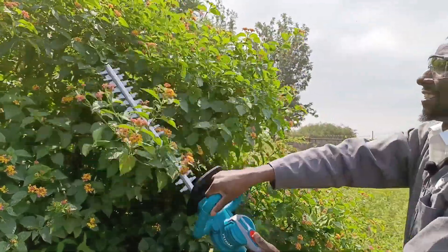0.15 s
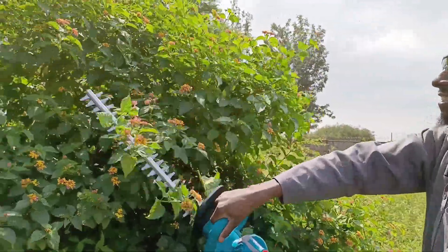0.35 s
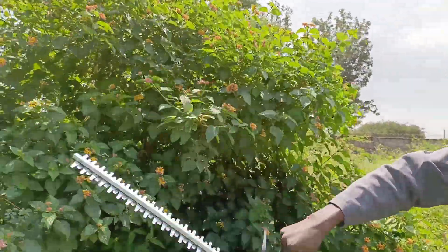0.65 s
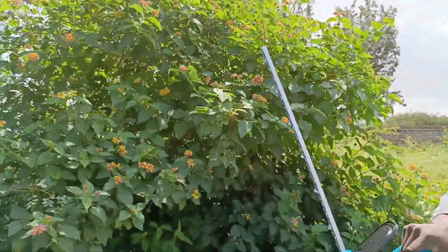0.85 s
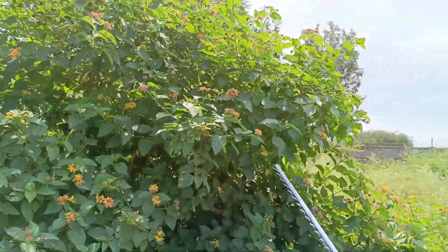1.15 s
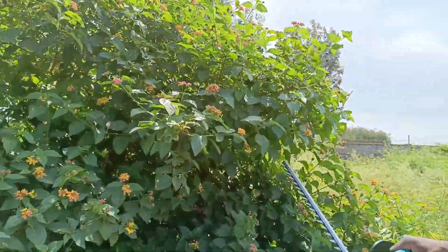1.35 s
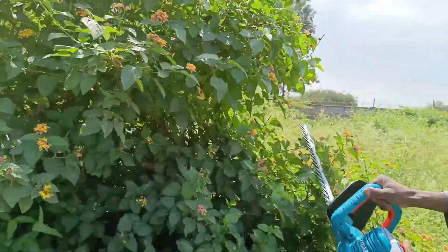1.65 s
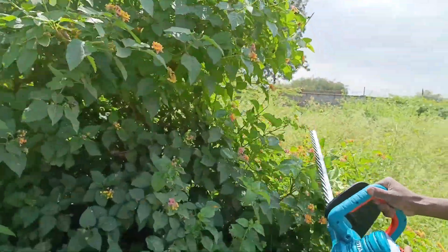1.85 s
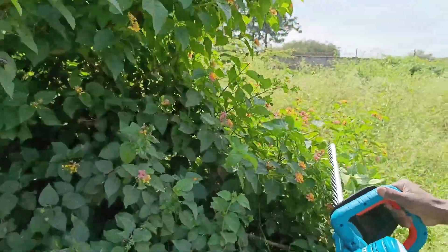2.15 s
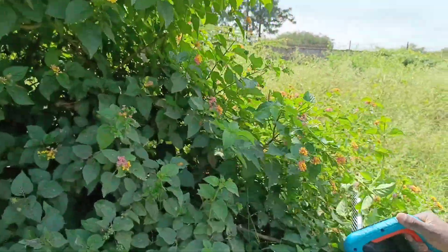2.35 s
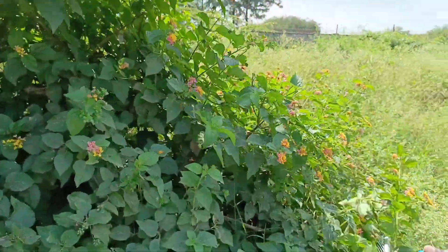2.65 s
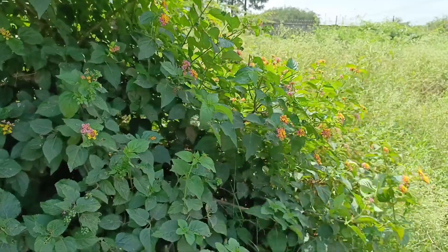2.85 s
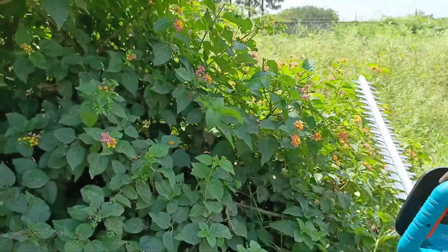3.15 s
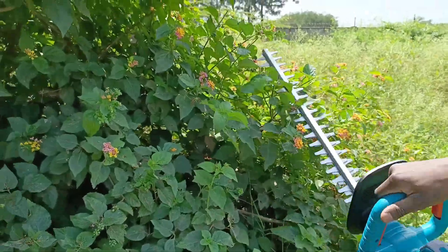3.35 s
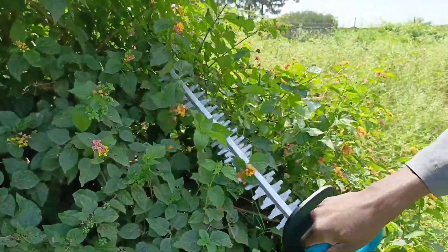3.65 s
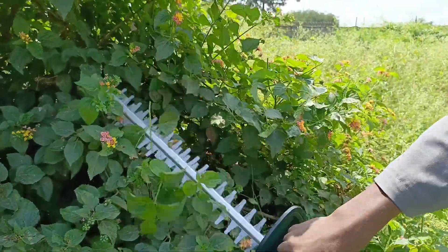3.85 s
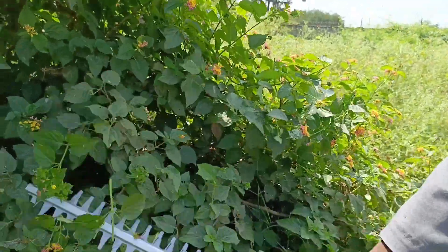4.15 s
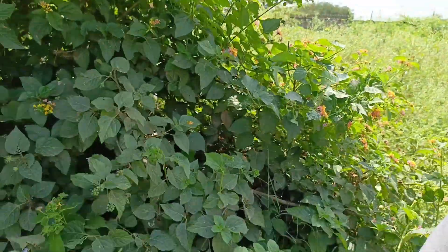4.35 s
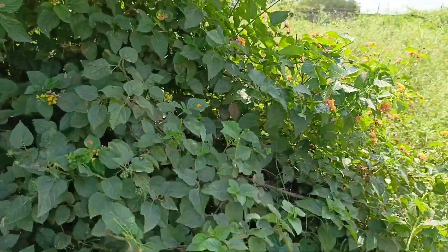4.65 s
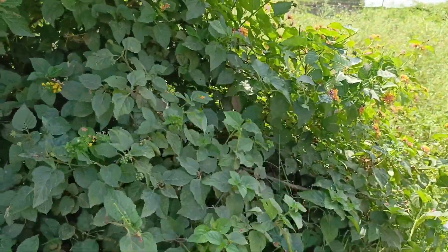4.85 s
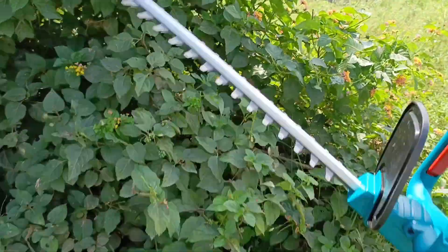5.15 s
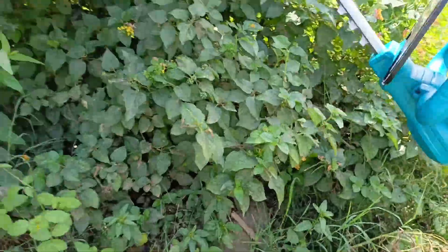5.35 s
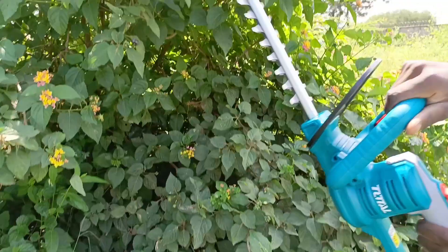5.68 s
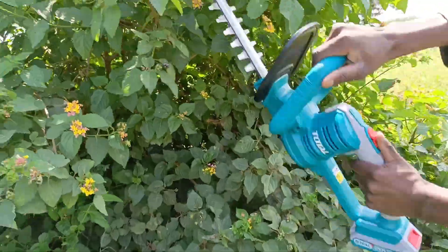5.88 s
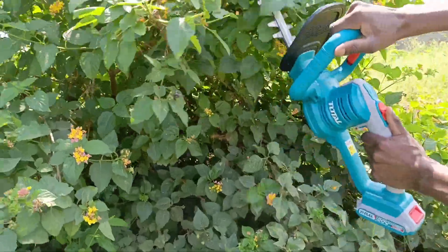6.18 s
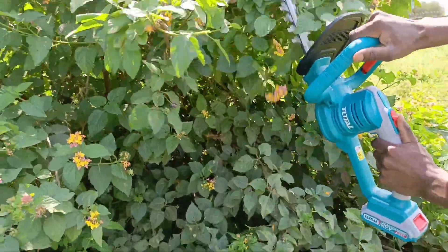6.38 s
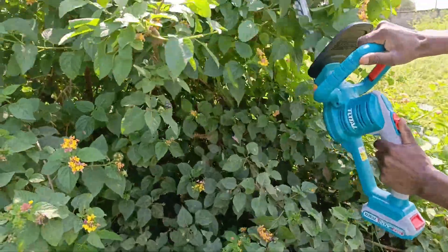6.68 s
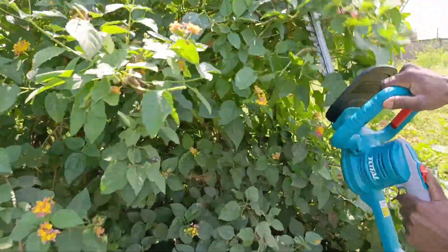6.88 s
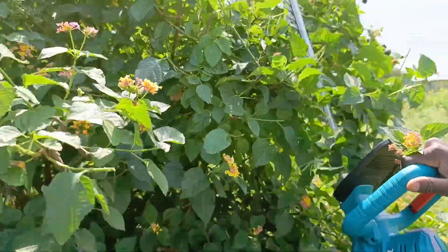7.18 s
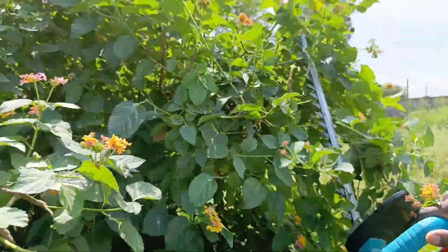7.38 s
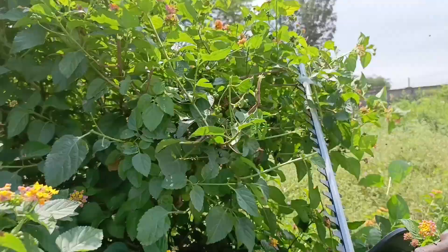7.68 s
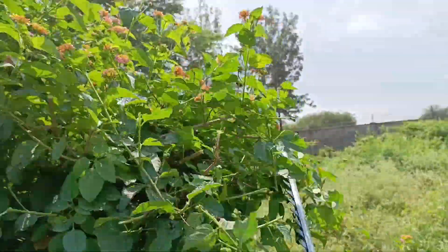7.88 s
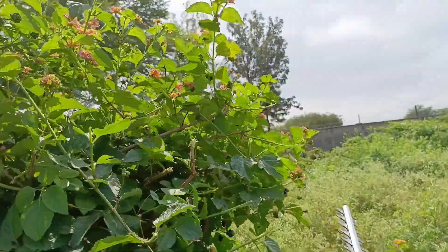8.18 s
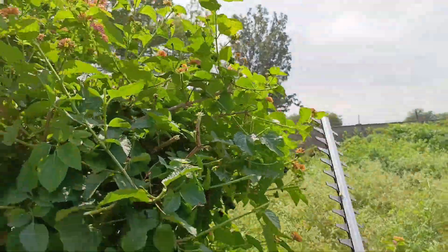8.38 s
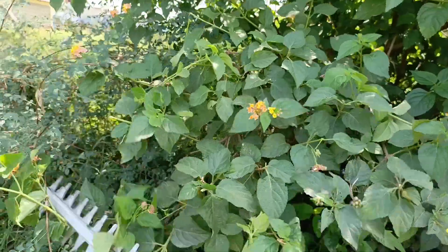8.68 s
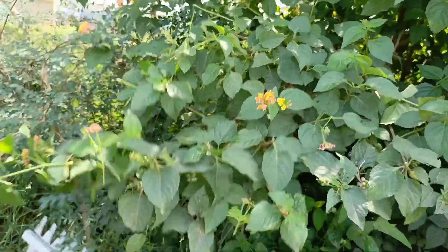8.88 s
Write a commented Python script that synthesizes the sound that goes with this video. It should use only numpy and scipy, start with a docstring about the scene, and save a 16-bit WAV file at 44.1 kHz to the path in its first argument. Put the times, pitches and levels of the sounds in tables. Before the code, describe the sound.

A handheld trimmer's reciprocating blades make a dry, rapid, noisy rattle, about forty-three strokes a second, with raspy metallic ring and harder bites into twigs. Five runs begin and end abruptly with plastic trigger and gear clicks; leaves settle softly in the short pauses. Close microphone, outdoors with no echoing walls, only a low air rumble and a weak far engine behind.

```python
"""A cordless hedge trimmer works through a leafy bush in five runs, close by and in the open air.
Its blades shuttle about 43 times a second; every stroke is a burst of noisy tooth impacts that shakes
the housing and rings the steel. Noise bursts and dying sines make the trigger and gear clicks at starts
and stops, and low noise thuds the handling bumps. Leaves settle in the pauses as showers of tiny blows;
a far engine drones on three harmonics over a soft rumble of filtered noise."""
import sys
import numpy as np
from scipy import signal
from scipy.fft import rfft, irfft, next_fast_len
from scipy.io import wavfile
from scipy.ndimage import map_coordinates

SR = 44100
rng = np.random.default_rng(int(sys.argv[2]) if len(sys.argv) > 2 else 0)


def unload_audio(sound):
    """Save the sound as a 16-bit wav file, at the path given as the first command line argument."""
    columns = np.transpose(np.atleast_2d(sound))
    # keep every value between -1 and 1, then stretch to whole-number steps
    steps = np.round(np.clip(columns, -1, 1) * 32767)
    wavfile.write(sys.argv[1], SR, steps.astype(np.int16))


N = 397782  # length in samples

STROKE_HZ = 43.24  # blade strokes a second
TOP_HZ = 15800  # nothing sounds above this
LEAVES_DB = -66.5  # leaves stirring
BAR_DB = -47.5  # ring of the guide bar while running, before it sings out

# Colour of the open-air rumble. Each row: frequency in Hz, relative level in dB.
AIR_COLOUR = [(15, -40.5), (25, -26), (52, -15.5), (76, -13), (94, -9), (110, -10), (157, -14.5),
              (333, -24), (587, -24), (1220, -28.5), (12100, -62), (15800, -73)]
# Far engine. Each row: time in seconds, pitch in Hz, level in dB.
FAR_ENGINE = [(0, 80, -52), (1.6, 85.9, -57.5), (2.3, 102, -51), (2.8, 140.6, -54), (3.25, 163, -52),
              (3.7, 139.7, -71), (4.35, 55.7, -55), (5.2, 57.9, -60.5), (8.4, 71.7, -55), (9, 74, -68)]
# Branches spring back in the pauses. Each row: middle in seconds, half-length in seconds,
# lift over the stirring in dB.
RUSTLES = [(.72, 0.14, 10.5), (4.92, .09, 8.5), (5.25, .06, 6), (8.38, 0.16, 8.5)]
# Dull handling thumps. Each row: start in seconds, level in dB.
BUMPS = [(6.12, -35), (7.51, -33)]
# Trigger and gear clicks. Each row: start in seconds, level in dB, relative trim of the knock in dB,
# relative trim of the snap in dB, time for the burst to fall by 60 dB in seconds.
CLICKS = [(0.659, -27, -12, -7, .02), (0.677, -27, -12, -15, .022), (0.985, -30, -8, -10, .016),
          (1.013, -27, -17, -15, 0.021), (1.372, -28, -7, -20, .03), (4.788, -20, -18, -9, .022),
          (4.808, -12.5, -16, -14, .022), (5.127, -24.5, -19, -12, .018), (5.292, -11.5, -17, -18, .03),
          (8.254, -2, -21.5, -15.5, 0.035), (8.463, -10, -20, -15, .014)]
# Modes struck by a click. Each row: frequency in Hz, relative level in dB, time to fall by 60 dB in seconds.
CLICK_MODES = [(590, -25.5, 0.19), (2207, -37, .16), (2627, -36, 0.15), (3000, -11, 0.016),
               (5880, -12.5, 0.012), (10290, -42, 0.17)]
# Trigger held. Each row: start in seconds, release in seconds, spin-up in seconds,
# time to brake by 60 dB in seconds.
RUNS = [(-.03, 0.579, .01, 0.12), (1.016, 1.318, 0.051, 0.07), (1.376, 4.702, 0.061, 0.1),
        (5.29, 8.187, 0.075, 0.12), (8.47, 9.061, 0.005, .09)]
# Hard strokes, where the teeth meet a stem. Each row: time in seconds, level over a plain stroke in dB.
BITES = [(1.133, 1), (1.642, 6.5), (1.67, 5.5), (1.735, 3.5), (2.011, 5.5), (2.064, 5), (2.25, 3),
         (2.34, 6.5), (2.509, 4.5), (2.585, 5), (2.962, 6.5), (3.061, 6), (3.635, 3.5), (4.084, 1.5),
         (4.316, 3), (5.914, 5.5), (6.055, 6), (6.172, 5.5), (6.591, 6.5), (7.126, 3.5), (7.542, 5),
         (8.121, 2.5), (8.54, 3.5), (8.61, 5.5)]
# How the tool is held. Each row: time in seconds, view, where 0 is blades edge-on, 1 the flat of the
# blades and 2 the motor side towards the listener.
VIEW = [(.55, 1.66), (1.1, 0.24), (2.15, 0.21), (2.6, 0.58), (3.1, 0.39), (3.9, 1.2), (4.7, 1.34),
        (5.55, 0.53), (5.88, 2.12), (7.1, 1.77), (7.85, 1.93), (8.5, 1.2)]
# Effort of the cut. Each row: time in seconds, clatter level in dB.
EFFORT = [(0, -19), (.55, -22.5), (1.1, -19.5), (1.5, -20.5), (2.5, -20.5), (2.85, -22.5), (3.05, -20.5),
          (4.1, -22), (5.6, -21), (6.2, -21), (8, -21), (8.9, -21)]
# Broad colour of the clatter. Each row: frequency in Hz, relative level in dB.
CLATTER_COLOUR = [(100, -37), (200, -23.5), (360, -16.5), (480, -2.5), (590, -6.5), (950, -0.5),
                  (1950, -6.5), (3400, -7.5), (4400, -10), (5700, -10.5), (6200, -15.5), (7200, -18),
                  (8100, -26), (9900, -23.5), (11400, -31), (13000, -34.5), (15700, -29.5)]
# Resonances of housing and blades. Each row: frequency in Hz, width in Hz, lift in dB.
BODY_MODES = [(297, 38, 6.5), (491, 86, 4.5), (714, 195, 4), (991, 144, 4), (1747, 166, 5.5),
              (2355, 390, 5.5), (2710, 360, 4.5), (3406, 600, 3), (5970, 150, 5), (6545, 73, 9),
              (7670, 160, 5.5), (8620, 310, 8), (9240, 130, 9.5), (10080, 95, 3.5), (11680, 120, 4),
              (14780, 200, 5)]
# Housing, gearbox, guard, cutter and teeth each radiate in a band. Each row: centre in Hz, half-width in
# octaves, lift edge-on in dB, lift flat in dB, lift motor side in dB, dB gained per dB of rasp.
PARTS = [(1076, 0.3, 0.5, -3.5, 2, 0), (2000, 0.28, 3.5, 2.5, -8, 0), (3640, 0.21, -3.5, 5, 0, 0),
         (5270, 0.27, -0.5, 0, -4, 0.56), (8600, 0.4, -4.5, 3.5, 1.5, 0)]
# The blades rub hard on each other and the cutter rings. Each row: middle in seconds,
# half-length in seconds, rasp in dB.
RASPS = [(.3, 0.11, 9.5), (1.8, .3, 4.5), (2.52, 0.35, 10), (3.52, .17, 5), (4.3, 0.48, 5.5), (8.87, .1, 4)]
# A band of the clatter thins out for a moment. Each row: middle in seconds, half-length in seconds,
# change in dB, centre in Hz, half-width in octaves.
HOLLOWS = [(2.2, 0.6, -7, 1940, .08), (3.13, 0.23, -11, 1054, 0.25), (8.7, .4, -4.5, 4500, 0.26)]
# Modes of the guide bar. Each row: frequency in Hz, relative level in dB, time to fall by 60 dB in seconds.
BAR_MODES = [(6460, -26, 0.039), (7035, -3, 0.31), (8970, -15, 0.12), (10700, -29, .13)]
# The guide bar sings out. Each row: middle in seconds, half-length in seconds, lift in dB.
SINGS = [(2.2, 0.6, 5), (3.12, 0.17, 8), (4.1, 0.29, 9), (6.3, 0.81, 11)]
# The guide bar rings as the blades halt. Each row: start in seconds, level in dB.
BRAKES = [(.58, -50), (1.325, -47), (4.73, -33.5), (8.255, -47)]


def amp(db):
    """Decibels to gain."""
    return 10 ** (np.asarray(db) / 20)


def unit(x):
    """x at rms 1."""
    return x / np.sqrt(np.mean(x ** 2) + 1e-20)


def along(points, hz):
    """A curve through (Hz, value) points on a log axis."""
    f, v = np.transpose(points)
    return np.interp(np.log(hz + 1), np.log(f + 1), v)


def curves(rows):
    """One value per sample for each column after the time."""
    s, *columns = np.vstack(rows).T
    return [np.interp(np.arange(N) / SR, s, column) for column in columns]


def swells(rows):
    """A smooth rise and fall for every (middle s, half-length s, dB) row, in dB."""
    t = np.arange(N) / SR
    return sum(db * np.exp(-((t - s) / half) ** 2) for s, half, db in rows)


def wobble(rate):
    """A smooth random curve, rate knots a second."""
    knots = rng.standard_normal(int(N * rate / SR) + 4)
    return map_coordinates(knots, [np.arange(N) * rate / SR])


def filtered(x, response):
    """x times a response of frequency."""
    m = next_fast_len(N + SR // 2)
    return irfft(rfft(x, m) * response(np.fft.rfftfreq(m, 1 / SR)), m)[:N]


def band(x, lo_hz, hi_hz):
    """The part of x between two soft edges."""
    return filtered(x, lambda f: (1 - 1 / (1 + (f / lo_hz) ** 8)) / (1 + (f / hi_hz) ** 8))


def lifted(x, hz, octaves, db):
    """x with one band raised or lowered by a changing amount."""
    part = filtered(x, lambda f: np.exp(-(np.log2((f + 1) / hz) / octaves) ** 2))
    return x + part * (amp(db) - 1)


def struck(x, gain_db, size=8192):
    """x through a body of the given colour, which rings only after each blow."""
    # folding the cepstrum forward makes the response minimum-phase
    cepstrum = irfft(np.log(amp(gain_db(np.fft.rfftfreq(size, 1 / SR))) + 1e-6))
    cepstrum[1:size // 2] *= 2
    cepstrum[size // 2 + 1:] = 0
    body = irfft(np.exp(rfft(cepstrum)))
    return signal.fftconvolve(x, body)[:N]


def impacts(rate, spread_db):
    """Random tiny blows of unequal size, rate a second on average, rms 1."""
    hits = rng.random(N) < rate / SR
    sizes = amp(spread_db * np.clip(rng.standard_normal(N), -2, 2))
    return unit(hits * rng.choice([-1, 1], N) * sizes)


def mode(hz, t60):
    """A dying sine whose envelope starts at 1 and falls 60 dB in t60 seconds."""
    t = np.arange(SR // 2) / SR
    return amp(-60 * t / t60) * np.sin(2 * np.pi * hz * t)


def played(rows, shape):
    """One shape sounded at every (s, dB) row."""
    blows = np.zeros(N)
    for s, db in rows:
        blows[round(s * SR)] = amp(db)
    return signal.fftconvolve(blows, shape)[:N]


def reflected(x, delay, swing, share):
    """x plus its bounce off a near surface; the path changes slowly as the tool is swept about."""
    lag = delay * np.exp(swing * wobble(1.5)) * SR
    return x + share * map_coordinates(x, [np.arange(N) - lag])


def facing(levels_db):
    """Level of a part as the tool turns, from its levels in the three views."""
    return np.interp(curves(VIEW)[0], np.arange(len(levels_db)), levels_db)


def outdoors(air_db=-53, overtone_db=-8):
    """Soft open-air rumble and a far engine that changes speed and flutters on the wind."""
    hz, db = curves(FAR_ENGINE)
    drift, flutter_db = .05 * wobble(40), 2 * wobble(45)
    phase = 2 * np.pi * np.cumsum(hz * (1 + drift)) / SR
    # each overtone is weaker than the one below by overtone_db
    engine = sum(amp(overtone_db * (k - 1)) * np.sin(k * phase) for k in range(1, 4))
    air = unit(filtered(rng.standard_normal(N), lambda f: amp(along(AIR_COLOUR, f))))
    return amp(db + flutter_db) * unit(engine) + amp(air_db + wobble(1.7)) * air


def leaves():
    """Brushed leaves rustle and settle: a coloured shower of tiny touches that swells in the pauses."""
    # (Hz, relative dB)
    colour = [(200, -12), (800, 15), (3500, 3.0), (7000, -3), (11000, -18), (15000, -23)]
    touches = impacts(rate=2200, spread_db=4)
    rustle = unit(struck(touches, lambda f: along(colour, f)))
    level_db = LEAVES_DB + swells(RUSTLES) + 2.2 * wobble(30)
    return amp(level_db) * rustle


def bumps():
    """Soft low thuds of noise that swell and die within a few cycles."""
    t = np.arange(SR // 4) / SR
    thud = unit(band(rng.standard_normal(N), 73, 240)[:len(t)])
    return played(BUMPS, thud * (1 - np.exp(-t / 0.0036)) * np.exp(-t / 0.024))


def clicks(rise=0.00075, ring_db=-8):
    """Trigger and gear backlash: a plastic knock, a crack, a bright snap and a short ring of the steel."""
    t = np.arange(SR // 3) / SR
    knock, crack, snap, ring = np.zeros((4, N + SR))
    for s, db, knock_db, snap_db, t60 in CLICKS:
        span = slice(round(s * SR), round(s * SR) + len(t))
        burst = amp(db - 60 * t / t60) * (1 - np.exp(-t / rise)) * rng.standard_normal(len(t))
        knock[span] += burst * amp(knock_db + 12.5)
        crack[span] += burst * amp(-3.5)
        snap[span] += burst * amp(snap_db + 1.5)
        for hz, mode_db, life in CLICK_MODES:
            ring[span] += amp(db + ring_db + mode_db) * mode(hz, life)[:len(t)]
    return band(knock, 320, 1600) + band(crack, 1830, 3760) + band(snap, 4400, 8800) + ring[:N]


def motor(idle_db=-13):
    """Drive of the motor: it spins up from idle_db under the trigger and brakes on release."""
    t = np.arange(N) / SR
    drive = np.zeros(N)
    for on, off, rise, brake in RUNS:
        spin_up_db = idle_db * np.clip(1 - (t - on) / rise, 0, 1)
        braking_db = -60 * np.maximum(t - off, 0) / brake
        drive += (t >= on) * amp(spin_up_db + braking_db)
    return drive


def strokes(scatter_db=1.0, length=0.012, attack=0.0015, fade=0.0056, slide_db=-7, usual_db=2):
    """Force on the blades: a burst at each reversal, lighter sliding between; the rhythm runs bite to bite."""
    starts = [(on, usual_db) for on, *_ in RUNS]
    marks = sorted(starts + [tuple(b) for b in BITES] + [(RUNS[-1][1], usual_db)])
    force, t = np.zeros(N + SR), np.arange(SR // 20) / SR
    # random lateness in seconds, size and stretch of each stroke
    chance = rng.standard_normal((len(marks), 80, 3)) * [.0013, 1, .18]
    for (s, db), (next_s, _), draws in zip(marks, marks[1:], chance):
        count = max(1, round((next_s - s) * STROKE_HZ))
        for k, (late, size, stretch) in enumerate(draws[:count]):
            # plain strokes come a little early or late, and differ in size and length
            when = s + k * (next_s - s) / count + (k > 0) * late
            hold = length * np.exp(stretch * (k > 0))
            burst = (1 - np.exp(-t / attack)) * np.exp(-np.maximum(t - hold, 0) / fade)
            level = amp(scatter_db * size if k else db) * (when >= 0)
            force[max(0, round(when * SR)):][:len(t)] += burst * level
    return unit(force[:N] + amp(slide_db))


def clatter_gain(f):
    """Colour of the clatter in dB: a broad curve plus a peak at each resonance of housing and blades."""
    peaks = sum(db / (1 + (2 * (f - hz) / width) ** 2) for hz, width, db in BODY_MODES)
    return along(CLATTER_COLOUR, f) + peaks


def clatter(force, drive, scrape_db=-1, vary_db=1.5, whirr_db=-25):
    """Teeth and gears hit and scrape; housing and blades colour the blows, each part by how it faces us."""
    scrape = amp(scrape_db) * rng.standard_normal(N)
    blows = force * (impacts(rate=2600, spread_db=3.5) + scrape)
    # the spinning motor adds an even, thin hiss between the strokes
    whirr = band(struck(rng.standard_normal(N), clatter_gain), 6900, 21000)
    sound = unit(struck(blows, clatter_gain)) + amp(whirr_db) * unit(whirr)
    rasp_db = swells(RASPS)
    for hz, octaves, *views_db, grows in PARTS:
        # every stroke lands on other teeth and shakes each part a little differently
        part_db = facing(views_db) + grows * rasp_db + vary_db * wobble(STROKE_HZ)
        sound = lifted(sound, hz, octaves, part_db)
    for *dip, hz, octaves in HOLLOWS:
        sound = lifted(sound, hz, octaves, swells([dip]))
    # the ground's bounce combs the clatter with faint shifting ridges
    sound = reflected(sound, delay=.005, swing=.15, share=.17)
    return unit(sound) * drive * amp(curves(EFFORT)[0])


def steel(shaking, ring, db):
    """A ring of the steel, knocked again at odd moments in the strokes."""
    knocks = shaking * impacts(rate=120, spread_db=3.5) * amp(db)
    return signal.fftconvolve(knocks, ring / np.linalg.norm(ring))[:N]


def trimmer():
    """The running tool: clatter and the rings of its steel; the guide bar sings on after a stop."""
    force, drive = strokes(), motor()
    bar_ring = sum(amp(db) * mode(hz, t60) for hz, db, t60 in BAR_MODES)
    cutter_ring = mode(hz=5685, t60=.032)
    # while the blades slide along the bar they damp its ring
    damping = np.exp(-np.arange(len(bar_ring)) / (.014 * SR))
    # cutter level in the three views, growing 0.96 dB per dB of rasp
    cutter_db = facing([-41, -38, -40.5]) + 0.96 * swells(RASPS)
    cutter = steel(force * drive, cutter_ring, cutter_db)
    bar = steel(force * drive, bar_ring * damping, BAR_DB + swells(SINGS))
    return clatter(force, drive) + cutter + bar + played(BRAKES, bar_ring)


def scene():
    """The tool in the bush, with no walls near."""
    return (outdoors() + leaves() + bumps() + clicks() + trimmer())[None]


def record(dry):
    """Everything from TOP_HZ upwards is cut away."""
    return filtered(dry[0], lambda f: f < TOP_HZ)[None]


dry = scene()
out = record(dry)
unload_audio(out)
```